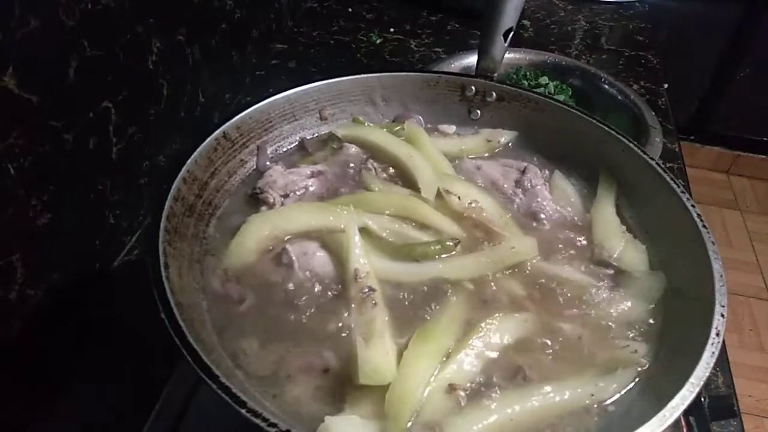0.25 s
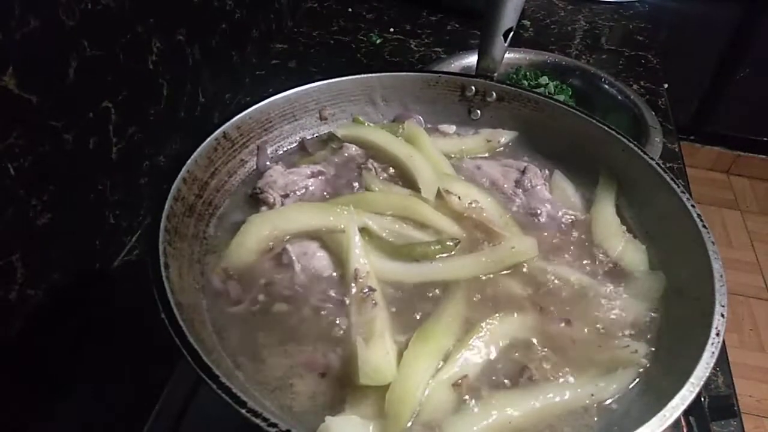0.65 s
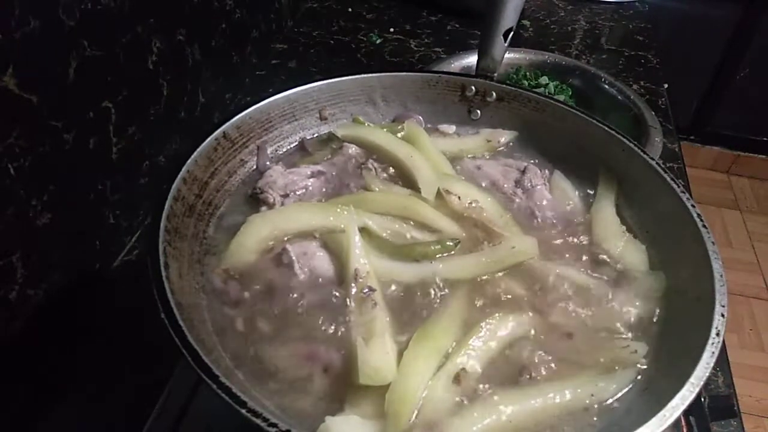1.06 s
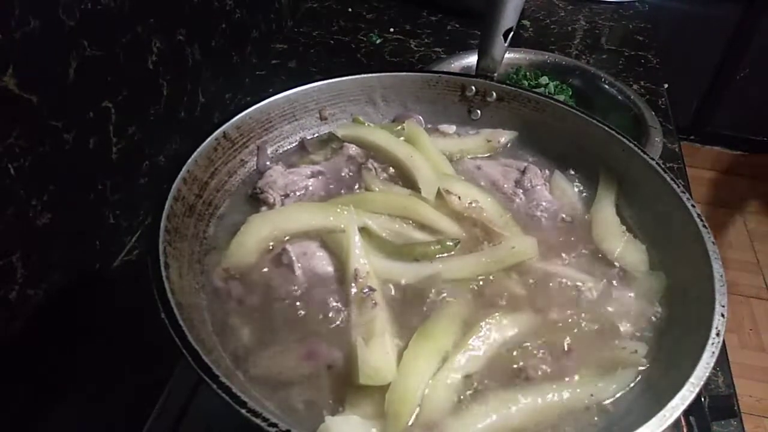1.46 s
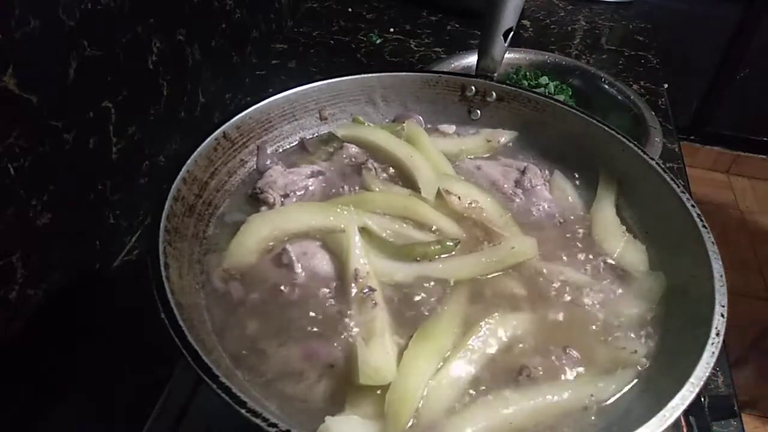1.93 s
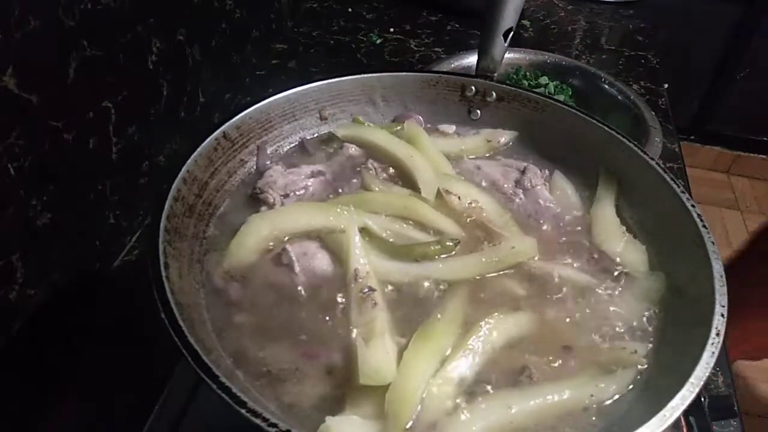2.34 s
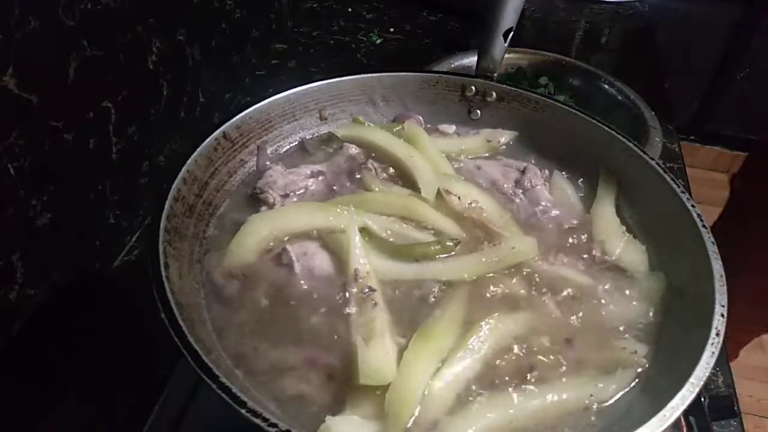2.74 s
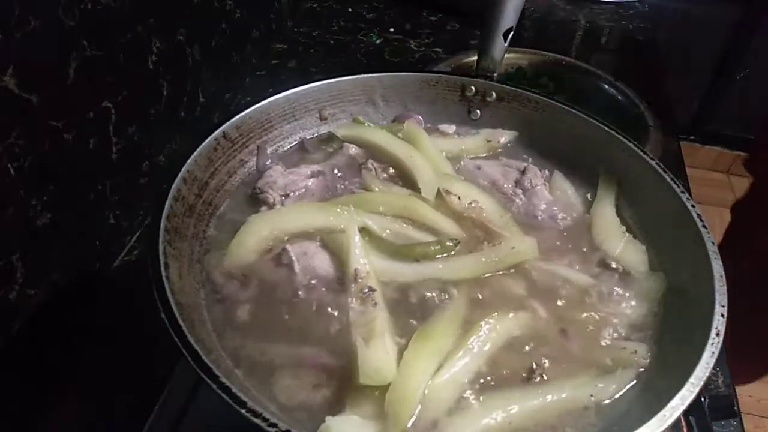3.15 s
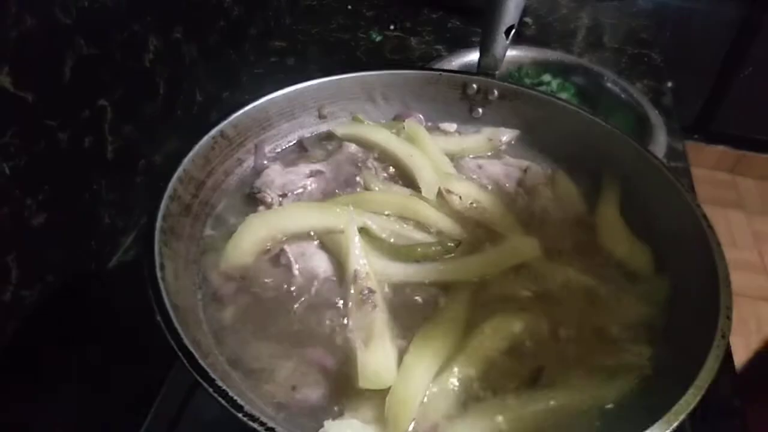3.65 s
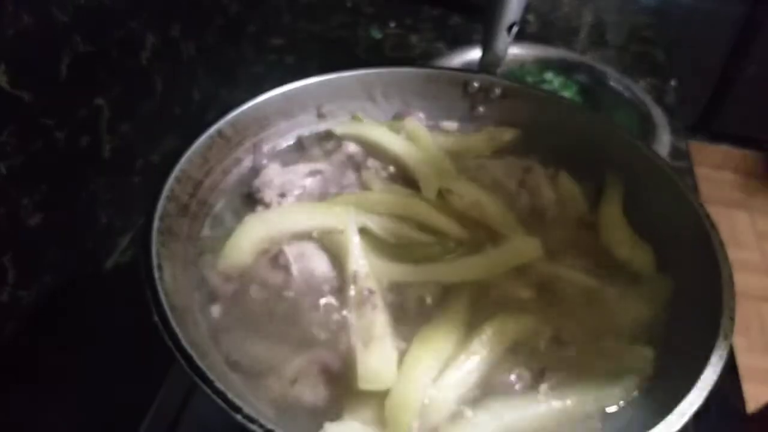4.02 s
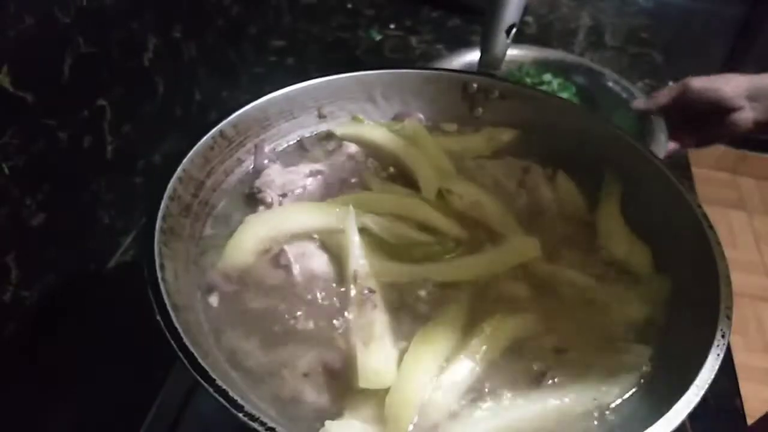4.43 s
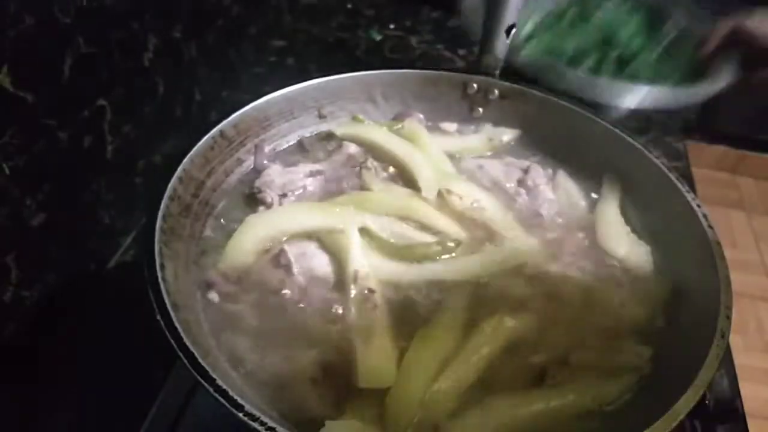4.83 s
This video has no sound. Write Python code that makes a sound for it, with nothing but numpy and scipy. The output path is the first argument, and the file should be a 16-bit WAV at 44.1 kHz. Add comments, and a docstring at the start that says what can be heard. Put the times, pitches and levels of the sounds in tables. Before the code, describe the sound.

A wide metal pan of broth simmers close to the microphone in a small hard kitchen. Uneven surges of bright sizzle and froth carry rounded bubble pops and tiny spitting ticks, busiest in the first two seconds, then thinner. Near the end a steel bowl bumps and scrapes on the counter with dull thuds and brief ringing, while bubbles pop louder again.

```python
"""Kitchen stove, microphone close above a wide metal pan of simmering broth, in a small hard room.
Surges swell swarms of tiny damped rings: a bright sizzle and sputter at the hot wall, froth and bubbling.
Larger bubbles pop as short rings, coloured by the pan; droplets spit as bursts of shaped noise.
Near the end a steel bowl of greens knocks and drags on the counter: noise thuds, slips and ringing modes.
Under it all lies the steady rush of the stove, with a few soft low hums."""
import sys
import numpy as np
from scipy import signal
from scipy.fft import rfft, irfft, next_fast_len
from scipy.io import wavfile
from scipy.ndimage import uniform_filter1d, map_coordinates

SR = 44100
rng = np.random.default_rng(int(sys.argv[2]) if len(sys.argv) > 2 else 0)


def generate_wav(sig):
    """Save sig (samples, or channels by samples) to the path in sys.argv[1] as 16-bit PCM at SR."""
    pcm = np.round(np.clip(np.atleast_2d(sig).T, -1, 1) * 32767).astype(np.int16)
    wavfile.write(sys.argv[1], SR, pcm)


N = 224307
TOP_HZ = 14450  # upper band limit

# steady rush of stove and kitchen: f/Hz, relative level/dB
STOVE_SPECTRUM = [(20, -38), (45, 3), (65, 0.5), (130, 6.5), (300, 4.5), (600, -0.5), (1200, -11),
                  (2500, -15), (6000, -57)]
STOVE_DB = -75
# soft low hums: t/s, level/dB, f/Hz, rise/s
HUMS = [(0.39, -64, 333, 0.028), (1.92, -64.5, 123, 0.082), (1.929, -70, 67, 0.093),
        (2.089, -58.5, 331, 0.037), (2.79, -67.5, 332, 0.12)]
HUM_WIDTH_HZ, HUM_FADE_DB_PER_S = 42, 125

# broth wells up and wets the hot wall: t/s, rise/s, sizzle level/dB, froth level/dB,
# bubbling level/dB before its trim, froth f/Hz, bubbling f/Hz
SURGES = [(0.001, 0.0016, -55, -48, -52, 2340, 940), (0.181, 0.0015, -39, -48, -48.5, 2480, 1310),
          (0.236, 0.042, -41.5, -59, -83, 2980, 940), (0.393, 0.0063, -43.5, -73, -66.5, 2500, 1110),
          (0.503, 0.019, -48, -57, -52, 1850, 1460), (0.57, 0.019, -42, -45.5, -41, 2400, 1500),
          (0.789, 0.012, -49.5, -68, -62.5, 2270, 1085), (0.839, 0.09, -31, -45.5, -36.5, 2220, 867),
          (0.914, 0.074, -70, -48, -40, 2010, 1230), (0.992, 0.049, -38.5, -56, -43.5, 2560, 930),
          (1.325, 0.09, -38.5, -56, -46.5, 2530, 1323), (1.452, 0.091, -43.5, -56.5, -52, 2480, 1330),
          (1.83, 0.03, -34, -51, -54, 3160, 910), (1.935, 0.038, -41, -53.5, -47, 2200, 1340),
          (2.115, 0.021, -43.5, -58, -69, 3600, 770), (2.386, 0.047, -43.5, -79, -67, 2970, 970),
          (2.608, 0.053, -42, -57, -52.5, 2370, 913), (2.693, 0.066, -35, -59.5, -77, 2880, 1210),
          (2.812, 0.039, -42, -61, -69, 2940, 1216), (3.235, 0.034, -41, -68, -67, 1890, 1300),
          (3.288, 0.036, -73, -59.5, -49.5, 3320, 1450), (3.354, 0.04, -42.5, -66, -64, 3300, 1460),
          (3.525, 0.032, -45, -79, -71, 2500, 910), (3.583, 0.013, -69, -77, -63, 2720, 1420),
          (3.84, 0.02, -67, -68, -56.5, 2360, 1230), (3.986, 0.027, -47.5, -51, -47, 2280, 980),
          (4.664, 0.023, -43, -57, -47, 2220, 1250), (4.786, 0.0075, -41, -46, -57, 2560, 1100)]
SIZZLE_FADE_DB_PER_S, FROTH_FADE_DB_PER_S, BUBBLING_FADE_DB_PER_S = 89, 244, 187
# quiet fizz under the surges: t/s, level/dB
SIMMER = [(0.0, -39), (0.71, -104), (0.75, -46), (0.86, -69), (1.25, -50.5), (1.58, -51), (1.7, -58),
          (1.76, -52), (2.36, -83), (2.47, -45.5), (3.01, -60), (3.22, -45), (3.67, -60), (3.68, -98),
          (3.77, -53.5), (4.36, -49), (5.05, -47.5)]
# fine bubbles bursting into steam: f/Hz, relative level/dB
STEAM_SPECTRUM = [(1500, -59), (2500, -33), (3300, -37.5), (4000, -20.5), (4500, -13.5), (5200, -9.5),
                  (6000, -9.5), (6500, -13), (7200, -6.5), (8000, -2.5), (8800, -0.5), (9800, -2),
                  (11300, -13), (12800, -22.5), (14400, -34)]
# finest spray: f/Hz, relative level/dB
SPRAY_SPECTRUM = [(7000, -38), (10500, -1.5), (12500, -2), (14400, -15.5)]
# coarse fizz of freshly wetted metal: f/Hz, relative level/dB
SPUTTER_SPECTRUM = [(2000, -54), (2550, -23), (2900, 8), (3400, -5.5), (3800, 4), (4500, -2.5), (6000, -12)]
SPUTTER_DB, SPUTTER_FADE_DB_PER_S = -20.5, 112  # relative to the sizzle of its surge; it dies sooner

# froth between the surges: f/Hz, relative level/dB
FROTH_SPECTRUM = [(600, -63), (1100, -9), (1500, 17), (2300, 9), (3000, 35), (3700, -44), (5000, -1),
                  (8000, -21)]
# larger bubbles between the surges: f/Hz, relative level/dB
BUBBLING_SPECTRUM = [(200, -46), (450, 0.5), (700, 16), (1000, -21), (1300, 13.5), (1700, 7.5), (2600, -2)]
FROTH_REST_DB, BUBBLING_REST_DB = -89, -79.5  # between the surges, before the room
# big bubbles heave the broth aside: t/s, level/dB, fade time constant/s, f/Hz
HEAVES = [(0.856, -47, 0.072, 327), (1.325, -50.5, 0.056, 500), (1.832, -47.5, 0.018, 690),
          (3.995, -54.5, 0.059, 557)]
# distance from the centre pitch to the -3 dB point
FROTH_OCTAVES, BUBBLING_OCTAVES, GURGLE_OCTAVES = 0.44, 0.22, 0.56

SMALL_POPS_PER_SURGE = 8
# level relative to the listed bubbling; spread of the delay; cycles to half-way up the envelope's rise time
SMALL_POP_DB, SMALL_POP_LAG_S, SMALL_POP_CYCLES = -4, 0.075, 2.43
# larger bubbles bursting: t/s, peak level/dB before pan and room, f/Hz, left minus right level/dB
POPS = [(0.112, -52, 1260, 2), (0.183, -33, 2330, -3), (0.205, -36, 1210, -16), (0.246, -54.5, 728, 9),
        (0.263, -43, 2850, 0), (0.285, -45, 1290, -1), (0.52, -48, 2130, -6), (0.542, -39.5, 1390, 2),
        (0.597, -42, 1700, -4), (0.791, -58.5, 1285, -23), (0.8076, -53, 3080, 0), (0.858, -46, 454, 5),
        (0.862, -54.5, 212, -16), (0.915, -50, 825, 2), (0.935, -41, 1890, 2), (0.962, -54, 880, -7),
        (1.003, -42, 945, -5), (1.0215, -37, 1340, -9), (1.038, -53, 693, 0), (1.296, -51, 1130, 0),
        (1.299, -56, 1670, -14), (1.328, -55, 507, 12), (1.343, -49, 588, 11), (1.346, -37.5, 1480, 16.5),
        (1.372, -51.5, 528, 0), (1.405, -43, 1310, -2), (1.441, -41.5, 1510, 2), (1.443, -48.5, 970, 0),
        (1.486, -67, 900, -1), (1.503, -48, 2030, 9), (1.527, -55, 2740, 5), (1.558, -44.5, 1430, -10),
        (1.578, -39, 1080, -4), (1.593, -57, 1106, -2), (1.636, -61, 660, 8), (1.646, -49, 1100, 2),
        (1.67, -48, 1220, -7), (1.734, -53.5, 1220, -14), (1.836, -44, 1080, 5), (1.858, -48, 577, -2),
        (1.878, -66, 774, -2), (1.961, -52, 1190, 3), (1.972, -52, 2220, 0), (1.989, -45.5, 1290, 1),
        (2.128, -62, 700, 8), (2.165, -61.5, 700, 0), (2.378, -57, 686, -13), (2.38, -57.5, 1026, -21),
        (2.383, -62.5, 1750, -27), (2.467, -54, 610, -1), (2.501, -59, 770, -9), (2.519, -57.5, 1380, 15),
        (2.606, -51.5, 1130, -6), (2.632, -53, 910, -16), (2.661, -63, 833, -4), (2.70, -58, 856, 2),
        (2.778, -53, 1170, -9), (2.933, -50, 1310, -1), (3.028, -54.5, 667, 7), (3.048, -61.5, 680, 7),
        (3.058, -52, 4050, 7), (3.142, -53, 685, 2), (3.17, -56, 672, 4), (3.272, -61.5, 630, 3),
        (3.326, -56, 1280, -9), (3.397, -47, 1330, -3), (3.412, -59, 1200, -3), (3.592, -55, 1240, -12),
        (3.599, -48.5, 1600, 16), (3.608, -60.5, 710, 17), (3.669, -64, 1525, 29), (3.759, -61, 1410, 8),
        (3.822, -56.5, 4100, -7), (3.843, -45, 1300, -9), (3.861, -51, 584, 4), (4.01, -62, 1180, 0),
        (4.0108, -52, 2740, 9), (4.03, -40, 708, -4), (4.043, -49, 663, 0), (4.067, -54, 696, -3),
        (4.114, -61, 627, -7), (4.157, -33.5, 1750, 17), (4.2, -40.5, 1630, 9), (4.292, -59.5, 1080, 22),
        (4.51, -37, 1150, 11), (4.519, -47, 1270, 23), (4.65, -38, 1260, 3), (4.99, -50, 1370, 6),
        (5.053, -38.5, 1160, 1), (5.055, -49, 700, -3), (5.06, -32.5, 1290, 0), (5.071, -36, 1720, 1)]
# cycles to half the rise time at the usual level; a pop this much louder is half as long
POP_CYCLES, POP_USUAL_DB, POP_HALVING_DB = 1.68, -44.5, 19.5
# resonances of the filled pan, rung by the pops: f/Hz, width/Hz, level/dB relative to the direct sound
PAN_RESONANCES = [(319, 3.3, 3), (672, 14.6, -0.5), (1214, 62, -7)]

# droplets spitting on hot metal: t/s, level/dB before a common trim
SPITS = [(0.183, -24), (0.2164, -32), (0.3945, -25.5), (0.4404, -36), (0.5055, -34), (1.7913, -38),
         (1.8455, -26), (2.118, -38), (2.156, -37), (2.2004, -34), (2.2665, -36.5), (2.2937, -37.5),
         (2.3785, -37.5), (2.5403, -31), (2.9817, -34), (3.0552, -33.5), (3.0942, -36), (3.1293, -38),
         (3.5219, -35), (3.6596, -36), (3.7234, -41), (3.7524, -37.5), (3.8706, -41), (3.9022, -34.5),
         (3.9955, -29), (4.57, -36), (4.6573, -37), (4.8405, -31), (5.02, -36), (5.057, -33)]
# tick of a droplet: f/Hz, relative level/dB
TICK_SPECTRUM = [(900, -27), (2000, -32), (3500, -31), (5000, -4.5), (6500, -2), (8500, 12), (10000, 5.5),
                 (12000, -11.5), (14400, -22)]

# bowl bumps the counter: t/s, thud level/dB before a common trim, hard-edge level/dB relative to the thud,
# ring level/dB before the mode levels, chatter time constant/s, upper -3 dB edge of the thud f/Hz
KNOCKS = [(4.353, -25, -26, -49.5, 0.016, 2500), (4.378, -16.5, -9.5, -43, 0.01, 2630),
          (4.383, -26, 1, -48, 0.0039, 3000), (4.390, -27, 2.5, -43.5, 0.0059, 2800),
          (4.412, -22, -18, -50, 0.0054, 1200), (4.435, -25, -4, -57, 0.0064, 2500),
          (4.569, -38, 5, -60, 0.0048, 3000), (4.606, -34.5, -23, -62, 0.014, 1800),
          (4.711, -23, -9.5, -51, 0.015, 1580), (4.7905, -26, 6, -53, 0.0082, 2500),
          (4.795, -26.5, 3.5, -50, 0.012, 2200), (4.926, -51, 18.5, -81, 0.0055, 2500)]
# bowl slides on the counter: t/s, rubbing level/dB before a common trim
DRAG = [(4.35, -28), (4.41, -32), (4.48, -33.5), (4.55, -40), (4.61, -44.5), (4.69, -47), (4.75, -37),
        (4.9, -41), (5.04, -68)]
# bowl on counter: f/Hz, relative level/dB
THUD_SPECTRUM = [(70, -59), (150, -36), (250, -5), (350, 1.5), (460, -0.5), (720, 4.5), (950, -3),
                 (1600, 1), (2400, -2), (3000, -13), (4000, -11), (6500, -22), (9000, -48)]
THUD_LOW_HZ = 202  # the light bowl radiates ever less below this
# hard edge contact: f/Hz, relative level/dB
EDGE_SPECTRUM = [(300, -26), (1500, 11), (2500, 7), (4000, 0.5), (6000, -0.5), (9000, -2.5), (13000, -45)]
# ringing modes of the steel bowl: f/Hz, resting level/dB, tipped-up level/dB, t60/s
BOWL_MODES = [(255, -9.5, -24, 0.48), (302, -12, -1, 0.34), (325.6, -8, 7.5, 0.41), (371.6, 5, 0, 0.32),
              (535, 2.5, -22, 0.48), (571, -6, -3, 0.52), (630, -6, -2, 0.37), (697, -4, -2, 0.27),
              (798, 0, -18, 0.45), (1090, -1, -3, 0.47), (1143, -14, 5, 0.26), (1230, -5, -3, 0.67),
              (1370, -14, -1, 0.65), (1480, -18, 3, 0.28), (1540, -16, -4, 0.5), (1657, 3, -14, 0.19),
              (1960, 3, -4, 0.24), (2031, -12, -6, 0.33), (2220, -4, -1, 0.6), (2470, 10.5, -8, 0.17),
              (2770, -15, -16, 0.6), (2850, -12, -4, 0.71)]
TIP_S = 4.7  # the bowl is tipped up from here on
GRIP_DB, GRIP_PER_S = 4, 45  # uneven damping by hand and counter: depth, changes a second
# dragging makes one mode sing: t/s of the crest, level/dB, f/Hz, half-length to 1/e in s
SINGING = [(4.61, -41, 700, 0.01), (4.679, -44.5, 694, 0.031)]

# left-right likeness of diffuse sound: f/Hz, correlation
LIKENESS = [(60, 0.96), (300, 0.73), (630, 0.5), (1300, 0), (3000, 0)]
# tilt of the stereo image: f/Hz, left minus right level/dB
IMAGE_TILT = [(200, 0.5), (500, 3.5), (1260, 0.5), (2500, 2), (5000, 4), (7000, 6), (8200, 14.5),
              (9800, -1), (11500, 0), (14000, 11.5)]
# reverberation of the kitchen: f/Hz, t60/s
KITCHEN_T60 = [(150, 0.14), (1000, 0.2), (4000, 0.39), (12000, 0.032)]


def amp(db):
    """Decibels to gain."""
    return 10 ** (np.asarray(db) / 20)


def unit(x):
    """Scale to rms 1."""
    return x / np.sqrt(np.mean(x ** 2) + 1e-20)


def along(points, hz):
    """(Hz, value) points read on a log frequency axis."""
    f, v = np.transpose(points)
    return np.interp(np.log(hz + 1), np.log(f + 1), v)


def gains(rows):
    """One gain per sample for each dB column after the time."""
    s, *columns = np.transpose(rows)
    return [amp(np.interp(np.arange(N) / SR, s, column)) for column in columns]


def add(track, s, sound):
    """Mix a stereo sound in at s seconds."""
    start = max(round(s * SR), 0)
    track[:, start:start + sound.shape[1]] += sound[:, :N - start]


def filtered(x, response):
    """x times a response of frequency."""
    n = x.shape[-1]
    size = next_fast_len(n + 8192)
    spectrum = rfft(x, size) * response(np.fft.rfftfreq(size, 1 / SR))
    return irfft(spectrum, size)[..., :n]


def diffuse(pair, spectrum):
    """Colour two unrelated signals and blend them: alike in the bass, apart in the treble; rms 1."""
    def mid_side_gains(hz):
        """Shares of mid and side that give the wanted left-right correlation."""
        angle = np.arccos(np.clip(along(LIKENESS, hz), -1, 1)) / 2
        return amp(along(spectrum, hz)) * [np.cos(angle), np.sin(angle)]

    mid, side = filtered(pair, mid_side_gains)
    return unit(np.array([mid + side, mid - side]))


def diffuse_noise(length, spectrum):
    """Coloured stereo noise; rms 1."""
    return diffuse(rng.standard_normal((2, length)), spectrum)


def grains(rate, top_hz, life, spread_db):
    """A swarm of tiny bubbles, each a damped ring of its own moment, pitch and size; rms 1."""
    count = int(rate * N / SR)
    t = np.arange(int(6 * life * SR)) / SR
    at = (rng.integers(N, size=(count, 1)) + np.arange(len(t))).ravel()
    hz = rng.uniform(0, top_hz, (count, 1))
    size = amp(spread_db * np.clip(rng.standard_normal((count, 1)), -2, 2))
    shape = size * t / life * np.exp(-t / life)

    def channel():
        """The same bubbles with fresh phases."""
        rings = shape * np.sin(2 * np.pi * (hz * t + rng.random((count, 1))))
        return np.bincount(at, rings.ravel(), N)[:N]

    return unit(np.array([channel(), channel()]))


def wander(x, depth_db):
    """Bubbling moves about the pan, so wall echoes favour ever different pitches: band levels drift."""
    bands = signal.stft(x, nperseg=512)[2]
    field = uniform_filter1d(rng.standard_normal(bands.shape), size=3, axis=1)  # over frequency
    field = uniform_filter1d(field, size=22, axis=2)  # over time
    return unit(signal.istft(bands * amp(depth_db * unit(field)))[1][:, :N])


def room(x, wet_db):
    """Sound plus a kitchen tail in which each frequency dies at its own speed."""
    hz, t, bands = signal.stft(diffuse_noise(SR // 2, [(1, 0)]), SR, nperseg=256)
    tail = signal.istft(bands * amp(-60 * t / along(KITCHEN_T60, hz)[:, None]), SR)[1]
    # the tail starts 2.5 ms after the direct sound
    tail = np.pad(tail / np.linalg.norm(tail[0]), ((0, 0), (SR // 400, 0)))
    return x + amp(wet_db) * signal.fftconvolve(x, tail, axes=1)[:, :x.shape[1]]


def swell(age, rise, fade_db_per_s):
    """Gain of one surge: it swells, then dies away steadily."""
    rising = np.sin(np.pi / 2 * np.clip(age / rise, 0, 1)) ** 2
    return rising * amp(-fade_db_per_s * np.maximum(age - rise, 0))


def surging(levels_db, fade_db_per_s, rest):
    """Gain of one layer: the powers of all surges add over the resting gain."""
    t = np.arange(N) / SR
    power = rest ** 2
    for (s, rise, *_), db in zip(SURGES, levels_db):
        power = power + (amp(db) * swell(t - s, rise, fade_db_per_s)) ** 2
    return np.sqrt(power)


def background():
    """The steady rush of the stove as noise, with narrow-band low hums that swell and fade."""
    out = amp(STOVE_DB) * diffuse_noise(N, STOVE_SPECTRUM)
    t = np.arange(SR // 2) / SR
    for s, db, hz, rise in HUMS:
        noise = rng.standard_normal((1, len(t)))
        band = filtered(noise, lambda f: np.exp(-((f - hz) / HUM_WIDTH_HZ) ** 2))
        add(out, s, amp(db) * unit(band) * swell(t, rise, HUM_FADE_DB_PER_S))
    return out


def sizzle(tick_share=0.39, spray_db=-16.5):
    """Micro-bubbles burst at the hot wall: ticks in the lulls, dense fizz and coarse sputter in a surge."""
    levels_db = [db for _, _, db, *_ in SURGES]
    heat = surging(levels_db, SIZZLE_FADE_DB_PER_S, gains(SIMMER)[0])
    usual = np.mean(heat)
    swarm = grains(rate=15000, top_hz=TOP_HZ, life=0.00009, spread_db=-1.0)
    fizz = wander(diffuse(swarm, STEAM_SPECTRUM), depth_db=4.2)
    ticks = diffuse(grains(rate=500, top_hz=TOP_HZ, life=0.00025, spread_db=2.5), STEAM_SPECTRUM)
    spray = diffuse_noise(N, SPRAY_SPECTRUM)
    coarse = diffuse(grains(rate=4000, top_hz=7000, life=0.0005, spread_db=2), SPUTTER_SPECTRUM)
    coarse = wander(coarse, depth_db=6)
    sputter = amp(SPUTTER_DB) * surging(levels_db, SPUTTER_FADE_DB_PER_S, 0) * coarse
    # with the heat, ticks grow more slowly than the fizz and spray grows faster
    tick_gain = tick_share * np.sqrt(heat * usual)
    spray_gain = amp(spray_db) * heat * np.sqrt(heat / usual)
    return sputter + heat * fizz + tick_gain * ticks + spray_gain * spray


def clutch(swarm, s, hz, octaves):
    """The bubbles of a swarm from s seconds on whose pitches lie around hz; rms 1."""
    part = np.roll(swarm, -round(s * SR), axis=1)[:, :SR // 2]
    return diffuse(part, [(hz * 2 ** (k * octaves), -3 * k * k) for k in range(-4, 5)])


def boil(bubbling_trim_db=-13):
    """Each surge brings froth and larger bubbles of its own pitches; a heave sets off a low gurgle."""
    t = np.arange(SR // 2) / SR
    small = wander(grains(rate=1000, top_hz=5720, life=0.0011, spread_db=3.5), depth_db=4)
    large = grains(rate=600, top_hz=2400, life=0.0015, spread_db=4)
    deep = grains(rate=500, top_hz=1500, life=0.003, spread_db=3)
    out = amp(FROTH_REST_DB) * diffuse(small, FROTH_SPECTRUM)
    out += amp(BUBBLING_REST_DB) * diffuse(large, BUBBLING_SPECTRUM)
    for s, rise, _, froth_db, bubbling_db, froth_hz, bubbling_hz in SURGES:
        froth_gain = amp(froth_db) * swell(t, rise, FROTH_FADE_DB_PER_S)
        add(out, s, froth_gain * clutch(small, s, froth_hz, FROTH_OCTAVES))
        bubbling_gain = amp(bubbling_db + bubbling_trim_db) * swell(t, rise, BUBBLING_FADE_DB_PER_S)
        add(out, s, bubbling_gain * clutch(large, s, bubbling_hz, BUBBLING_OCTAVES))
    for s, db, fade, hz in HEAVES:
        gurgle_gain = amp(db) * (1 - np.exp(-t / 0.0056)) * np.exp(-t / fade)
        add(out, s, gurgle_gain * clutch(deep, s, hz, GURGLE_OCTAVES))
    return room(out, wet_db=-5.0)


def dome(t, hz, cycles, glide=0.001, scatter=0.0001):
    """A bursting dome rings a few cycles, its pitch rising slightly as its hole opens."""
    # each channel hears it after its own short delay (up to scatter, in s)
    delay = rng.uniform(0, scatter, (2, 1))
    age = np.maximum(t - delay, 0) * hz / cycles
    envelope = ((age / 2) ** 2 * np.exp(2 - age)) ** 3  # peaks at age 2
    return envelope * np.sin(2 * np.pi * cycles * age * (1 + glide * (age - 4)))


def small_pops(spread_db=2.5, spread_octaves=0.324):
    """Each surge leaves a cluster of small domes that burst in turn near the pitch of its bubbling."""
    out, t = np.zeros((2, N)), np.arange(SR // 20) / SR
    for s, rise, _, _, bubbling_db, _, bubbling_hz in SURGES:
        draws = np.clip(rng.standard_normal((SMALL_POPS_PER_SURGE, 3)), -2, 2)
        for size, pitch, wait in draws:
            lag = SMALL_POP_LAG_S * abs(wait)
            # later pops are weaker, at half the fade of the bubbling
            db = bubbling_db + SMALL_POP_DB + spread_db * size - BUBBLING_FADE_DB_PER_S * lag / 2
            hz = bubbling_hz * 2 ** (spread_octaves * pitch)
            add(out, s + rise / 2 + lag, amp(db) * dome(t, hz, SMALL_POP_CYCLES))
    return room(out, wet_db=-3.5)


def pops(wet_db=-0.5, wet_change_per_db_below_usual=-0.0142):
    """The larger bubbles burst as ringing domes: the louder, the shorter, with a trace more room."""
    out, t = np.zeros((2, N)), np.arange(SR // 5) / SR
    for s, db, hz, pan_db in POPS:
        below_usual_db = POP_USUAL_DB - db
        cycles = POP_CYCLES * 2 ** (below_usual_db / POP_HALVING_DB)
        ring = amp(db) * dome(t, hz, cycles)
        # the direct sound leans to one side, the kitchen answers from all round
        lean_change = ring * (amp([[pan_db / 2], [-pan_db / 2]]) - 1)
        pop_wet_db = wet_db + wet_change_per_db_below_usual * below_usual_db
        add(out, s, room(ring, pop_wet_db) + lean_change)
    return out


def pan_response(hz):
    """Response of the filled pan: the direct sound plus its resonances."""
    response = 1
    for f, width, db in PAN_RESONANCES:
        damping = 1j * hz * width
        response = response + amp(db) * damping / (f * f - hz * hz + damping)
    return response


def spits(life=0.0014, fizzle_db=-17, trim_db=-5):
    """A droplet flashes to steam: shaped noise with a sharp tick and a short fizzle."""
    out, t = np.zeros((2, N)), np.arange(SR // 3) / SR
    flash = t / life * np.exp(1 - t / life) + amp(fizzle_db) * np.exp(-t / 0.0077)
    for s, db in SPITS:
        tick = diffuse_noise(len(t), TICK_SPECTRUM) * flash
        add(out, s, room(amp(db + trim_db) * tick, wet_db=-5))
    return out


def bowl_knocks(crack_db=-7, knock_trim_db=-11.0, drag_trim_db=-10):
    """Bumps and the catching and slipping between them shake the counter; a soft bump thuds dully."""
    t = np.arange(SR // 5) / SR
    slips = diffuse(grains(rate=400, top_hz=3500, life=0.0009, spread_db=4), THUD_SPECTRUM)
    touching = np.arange(N) / SR > KNOCKS[0][0]
    out = amp(drag_trim_db) * gains(DRAG)[0] * touching * slips
    for s, db, hard_db, _, life, top_hz in KNOCKS:
        thud = diffuse_noise(len(t), THUD_SPECTRUM)
        thud = unit(filtered(thud, lambda hz: 1 / np.sqrt(1 + (hz / top_hz) ** 6)))
        edge = amp(hard_db) * diffuse_noise(len(t), EDGE_SPECTRUM)
        # a short crack over the chatter
        envelope = np.exp(-t / life) + amp(crack_db) * np.exp(-t / 0.002)
        add(out, s, amp(db + knock_trim_db) * envelope * (thud + edge))

    def low_cut(hz):
        """The bowl's weak radiation of low frequencies."""
        ratio = (hz / THUD_LOW_HZ) ** 4
        return ratio / np.hypot(1, ratio)

    return room(filtered(out, low_cut), wet_db=-2.5)


def bowl_ring(waver=0.29, tilt=0.078, scatter=0.00052, attack=0.0045):
    """Bumps ring the bowl, brighter when hard; tipping it up frees other modes, sliding makes it sing."""
    out, t = np.zeros((2, N)), np.arange(SR // 2) / SR

    def tone(hz):
        """One mode: the moving contact jostles its phase and damps it unevenly."""
        drift = waver * np.cumsum(rng.standard_normal(len(t))) / np.sqrt(SR / 20)
        grip = amp(GRIP_DB * map_coordinates(rng.standard_normal(GRIP_PER_S), [t * GRIP_PER_S]))
        # it reaches each channel at its own moment
        arrival = rng.uniform(0, scatter, (2, 1))
        return unit(grip) * np.sin(2 * np.pi * (hz * (t - arrival) + rng.random()) + drift)

    for s, _, hard_db, ring_db, *_ in KNOCKS:
        for hz, resting_db, tipped_db, t60 in BOWL_MODES:
            mode_db = tipped_db if s > TIP_S else resting_db
            db = ring_db + mode_db + tilt * hard_db * np.log2(hz / 1000)
            add(out, s, amp(db - 60 * t / t60) * (1 - np.exp(-t / attack)) * tone(hz))
    for s, db, hz, length in SINGING:
        middle = t.mean()
        add(out, s - middle, amp(db) * np.exp(-((t - middle) / length) ** 2) * tone(hz))
    return out


def image_tilt(hz):
    """Left and right gains that tilt the stereo image and keep the power."""
    pair = amp(np.outer([0.5, -0.5], along(IMAGE_TILT, hz)))
    return pair / np.sqrt(np.mean(pair ** 2, axis=0))


def scene():
    """Stove, pan and bowl close to the microphone, mostly a little to the left."""
    broth = background() + sizzle() + boil()
    bubbles = filtered(small_pops() + pops(), pan_response)
    return filtered(broth + bubbles + spits() + bowl_knocks() + bowl_ring(), image_tilt)


def record(dry):
    """The recorder keeps nothing above its band limit."""
    return filtered(dry, lambda hz: hz < TOP_HZ)


dry = scene()
out = record(dry)
generate_wav(out)
```